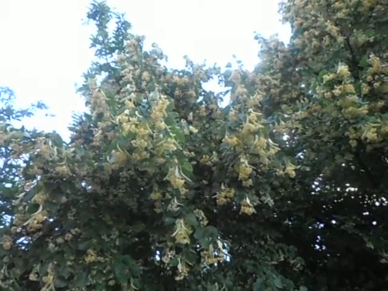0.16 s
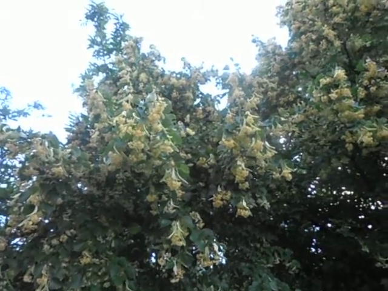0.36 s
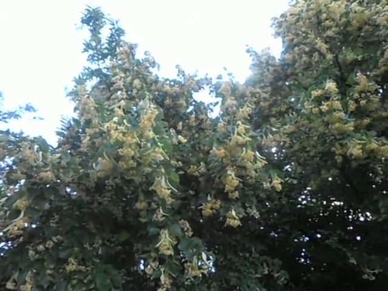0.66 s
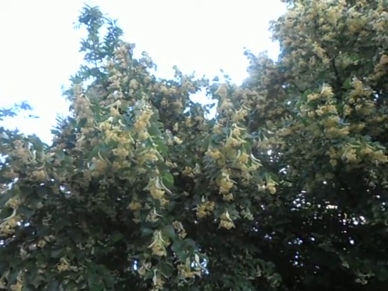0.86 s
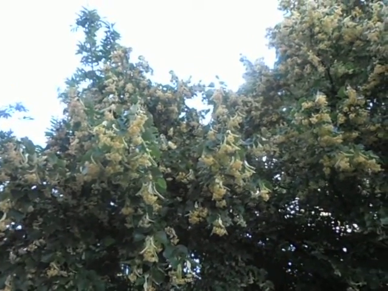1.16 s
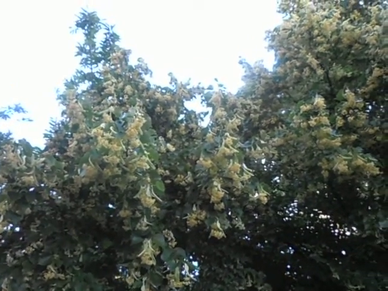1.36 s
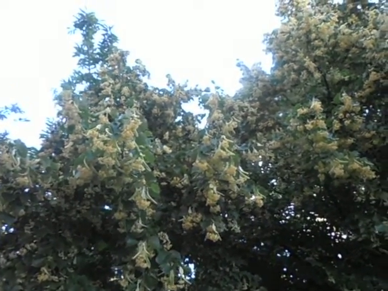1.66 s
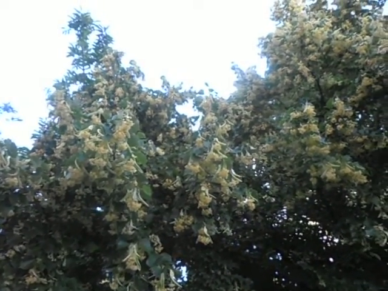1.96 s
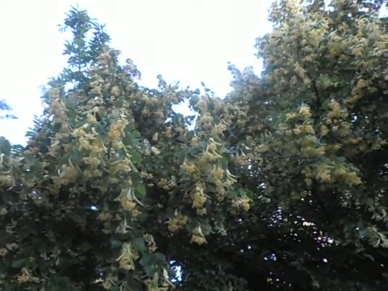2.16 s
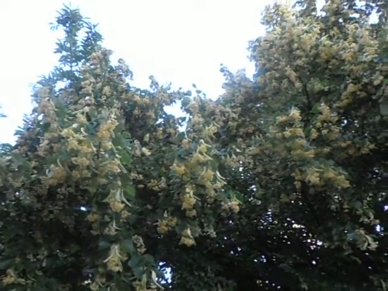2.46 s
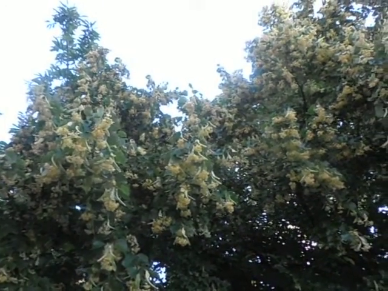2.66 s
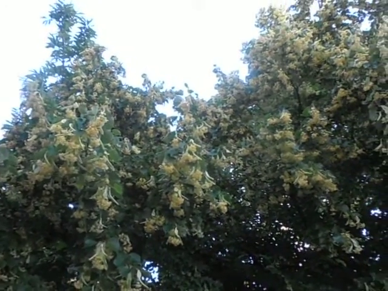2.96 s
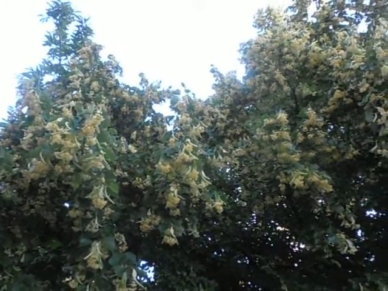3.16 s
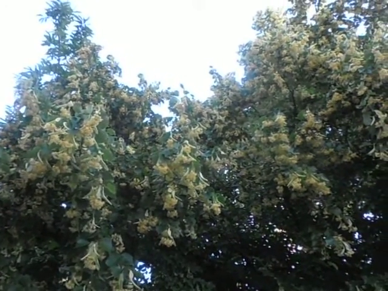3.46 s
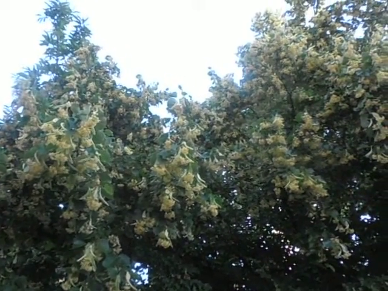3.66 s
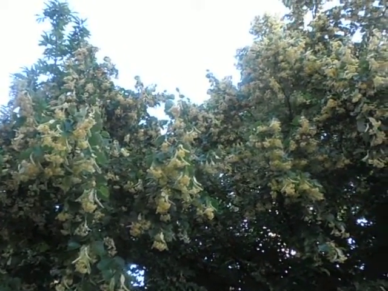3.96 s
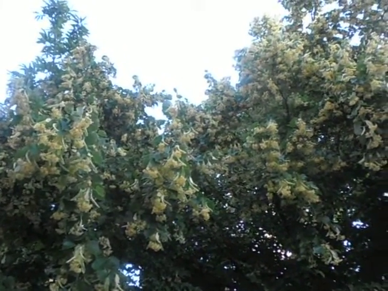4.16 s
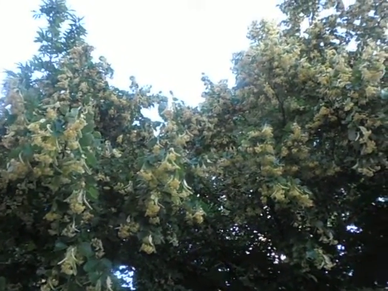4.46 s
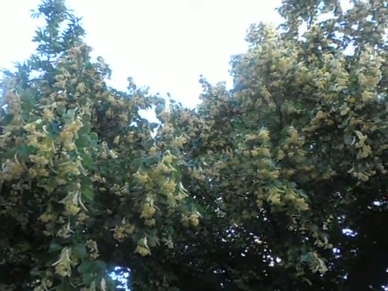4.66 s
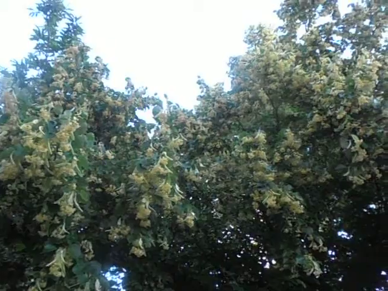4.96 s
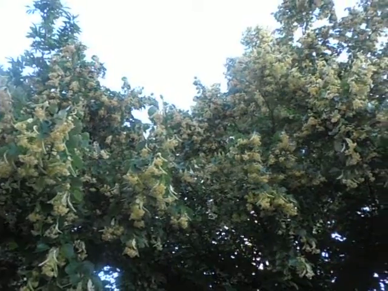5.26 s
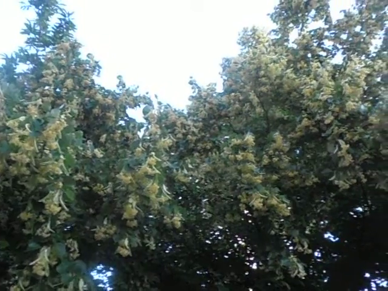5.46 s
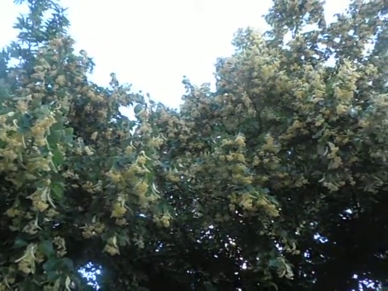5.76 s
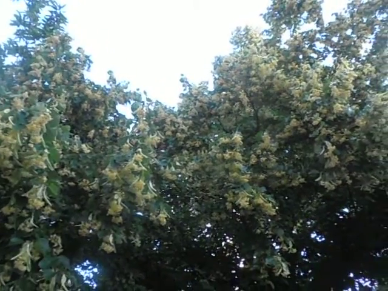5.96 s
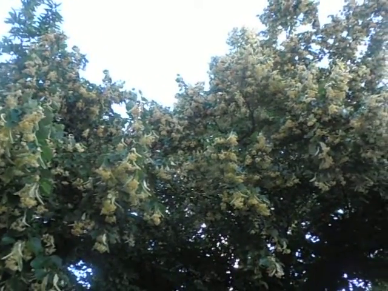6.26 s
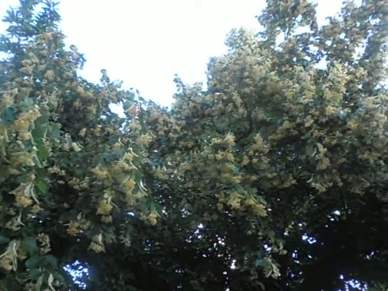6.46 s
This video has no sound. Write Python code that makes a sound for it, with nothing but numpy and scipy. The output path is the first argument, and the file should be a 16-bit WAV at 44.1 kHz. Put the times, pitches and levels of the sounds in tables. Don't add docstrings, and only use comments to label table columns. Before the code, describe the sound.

A crowd of bees hums evenly in a flowering tree while a finch sings one trilled phrase and a hard plastic click snaps at two seconds.

```python
import sys
import numpy as np
from scipy import signal
from scipy.fft import rfft, irfft
from scipy.io import wavfile
from scipy.ndimage import uniform_filter1d

SR = 44100
rng = np.random.default_rng(int(sys.argv[2]) if len(sys.argv) > 2 else 0)


def gain_from_db(level_db):
    decades = np.asarray(level_db, float) / 20
    return 10 ** decades


def wrap_up_sound(samples):
    columns = np.atleast_2d(samples).T
    tamed = np.clip(columns, -1, 1)
    steps = np.round(tamed * 32767).astype(np.int16)
    wavfile.write(sys.argv[1], SR, steps)


N = 291060

# (multiple of the wing beat, level [dB])
WING_OVERTONES = [(1, -10), (2, 0), (3, -7.5), (4, -9.5), (5, -10), (6, -10.5), (7, -14), (8, -45.5),
                  (9, -29)]
# (time [s], level [dB])
SWARM_LEVEL = [
    (0.0, -49),
    (0.46, -44.5),
    (0.81, -48),
    (1.29, -48),
    (1.6, -49),
    (3.75, -48),
    (4.08, -50.5),
    (4.7, -46),
    (4.96, -49.5),
    (6.6, -45.5),
]
# (delay [s], length [s], start pitch [Hz], end pitch [Hz], level [dB])
HIGH_SYLLABLE = [
    (-.03, 0.021, 6240, 6640, -5.5),
    (-.03, .014, 5800, 5860, -5),
    (.002, .017, 6060, 4600, 1.5),
    (.016, 0.0154, 4690, 3530, -2),
]
HIGH_LEAD_IN = [
    (-.058, .014, 7800, 6500, -8),
    (-.046, .013, 6570, 7500, -7),
]
LOW_SYLLABLE = [
    (-.001, 0.011, 4410, 4100, 2.5),
    (.012, .033, 4050, 3000, -0.5),
    (.041, .024, 3050, 2400, -5),
]
LOW_LEAD_IN = [
    (-.022, .023, 4700, 5900, -5.5),
]
QUICK_SYLLABLE = [
    (0, .008, 4480, 3100, -.3),
    (.008, .025, 3190, 2570, -1.4),
]
# (time [s], length [s], start pitch [Hz], end pitch [Hz], level [dB])
WHISTLES = [
    (2.401, .021, 5130, 3200, -49),
    (2.432, .04, 2610, 3860, -41),
    (2.466, .035, 3760, 2480, -45.5),
    (2.49, .035, 2570, 2170, -52),
    (2.44, 0.039, 5700, 4600, -59),
    (2.468, .018, 4570, 3600, -52),
    (2.485, .018, 3600, 4300, -58),
]
# (time [s], length [s], start pitch [Hz], end pitch [Hz], level [dB])
BUZZED_NOTES = [
    (2.113, .215, 2500, 4126, -43),
    (2.391, .027, 5450, 5340, -47),
    (5.93, .17, 6600, 6000, -68),
]
# (time [s], length [s], start pitch [Hz], end pitch [Hz], level [dB])
FAR_NOTES = [(.565, .02, 4875, 4000, -58), (.583, .052, 4000, 3980, -56), (.632, .009, 3900, 4650, -55),
             (.619, .02, 5900, 5200, -62), (2.176, .02, 5875, 5575, -66), (2.334, .03, 6150, 5600, -63),
             (2.555, .047, 6050, 4650, -59), (2.825, .02, 5100, 4600, -63), (2.985, .02, 4950, 4450, -61),
             (4.508, .09, 3125, 3060, -66), (4.692, .03, 2825, 2525, -63), (5.113, .022, 2615, 2625, -58),
             (5.158, .02, 2925, 2725, -62), (5.172, .09, 5650, 5780, -69), (5.33, .025, 4950, 4420, -60),
             (5.352, .065, 4440, 4475, -63), (5.504, .05, 4420, 4400, -65), (5.814, .06, 6525, 6775, -65),
             (4.96, .04, 3150, 2950, -65), (5.2, .035, 3000, 3100, -64), (5.69, .05, 3150, 3300, -65)]
# (delay [s], level [dB])
HEDGES = [
    (.032, -8),
    (0.045, -11.5),
]
# (time [s], level [dB], treble tilt [dB per octave])
LATCH_BLOWS = [
    (2.0831, -17, 9.5),
    (2.0839, -2, -1),
    (2.0872, -5.5, 7.5),
    (2.0883, 0, 0),
    (2.0896, -11.5, 6.5),
    (2.0977, -16, 0.5),
]
# (pitch [Hz], level [dB], time to fall 60 dB [s])
SHELL_TONES = [(1063, -14, 0.038), (1540, -26, .02), (1790, -14, 0.025), (1987, -6, 0.028),
               (2185, 2.5, 0.015), (2425, -5.5, 0.013), (2960, -11.5, .012), (4180, -20, .011),
               (4650, -22, 0.0085), (5800, -10, 0.0093), (7500, -6.5, 0.0088), (8490, -5.5, 0.007),
               (9900, -15, 0.0076), (13460, -3.5, 0.0064)]
# (time [s], length [s], level [dB])
FINGER_SHIFTS = [
    (.43, .03, -61),
    (.58, .04, -60),
    (1.59, .02, -55),
    (4.96, .03, -60),
    (5.05, .05, -60),
    (6.03, .1, -63),
    (6.24, .07, -55),
]
# (multiple of the clock, level [dB])
CLOCK_LEAKS = [(2, -82), (3, -79), (5, -81), (6, -92)]
# (frequency [Hz], level [dB per Hz])
TRAFFIC_COLOUR = [(20, -5), (60, -2.5), (130, -5), (280, -7.8), (900, -9), (1300, -15), (1700, -24),
                  (2500, -39)]
# (frequency [Hz], level [dB per Hz])
HISS_COLOUR = [(1000, -18), (3000, -18.5), (4000, -21), (7000, -19.5), (11000, -22), (16000, -24)]


def level(x, db):
    return x * gain_from_db(db) / np.sqrt(np.mean(x ** 2))


def band(x, lo_hz, hi_hz):
    return signal.sosfilt(signal.butter(2, [lo_hz, hi_hz], "band", fs=SR, output="sos"), x)


def walks(count, size, seconds):
    x = rng.standard_normal((count, size))
    width = max(int(seconds * SR / 8), 2)
    x = uniform_filter1d(uniform_filter1d(x, width, axis=1), width, axis=1)
    return x / x.std(axis=1, keepdims=True)


def bees(count=70):
    beat_hz, slower_hz, faster_hz = 178.8, 16, 26.96
    size = N // 8 + 1
    rank = (np.arange(count)[:, None] + .5) / count * 2 - 1
    own = np.sign(rank) * (1 - np.sqrt(1 - abs(rank)))
    place = own + .13 * walks(count, size, .35)
    spread_hz = np.where(place < 0, slower_hz, faster_hz)
    hz = beat_hz + spread_hz * place + 1.188 * walks(count, size, 0.01992)
    phase = 2 * np.pi * (np.cumsum(hz, axis=1) * 8 / SR + rng.random((count, 1)))
    near = gain_from_db(4.2 * walks(count, size, 0.26))
    hum = sum(gain_from_db(db) * np.sin(k * phase + k * k) for k, db in WING_OVERTONES)
    hum = signal.resample_poly((near * hum).sum(axis=0), 8, 1)[:N]
    s, db = np.transpose(SWARM_LEVEL)
    swell_db = 0.5 * (np.interp(np.arange(N) / SR, s, db) - db.mean())
    return level(hum, db.mean() + 2.5) * gain_from_db(swell_db)


def add_note(out, s, length, start_hz, end_hz, db, shake_hz=0., left=.36):
    u = np.arange(int(length * SR)) / (length * SR)
    hz = start_hz + (end_hz - start_hz) * (u + (2 - 4 * left) * u * (1 - u))
    uneven = 8 * uniform_filter1d(rng.standard_normal(len(u)), 64)
    wobble = np.cumsum(208.2 * (1 + 0.274 * uneven)) / SR
    hz = hz + shake_hz * np.sin(2 * np.pi * wobble)
    shape = np.sin(np.pi * u) ** (0.6 if shake_hz > 200 else 0.21)
    i = int(s * SR)
    out[i:i + len(u)] += gain_from_db(db) * np.sqrt(2) * shape * np.sin(2 * np.pi * np.cumsum(hz) / SR)


def trill(first_s, spacing_s, top_db, peak, fall_db, count):
    k = np.arange(count)
    return list(zip(first_s + spacing_s * k, top_db - fall_db * abs(k / (count - 1) - peak)))


def finch_song():
    finch = np.zeros(N)
    high = trill(.765, .14, -41.5, peak=0.96, fall_db=9, count=4)
    low = trill(1.2925, .147, -42.5, peak=0.83, fall_db=2.8, count=4)
    quick = trill(1.853, .0475, -46, peak=0.22, fall_db=15, count=5)
    parts = ((HIGH_SYLLABLE, high, 60), (HIGH_LEAD_IN, high, 350), (LOW_SYLLABLE, low, 40),
             (LOW_LEAD_IN, low, 350), (QUICK_SYLLABLE, quick, 150))
    for glides, times, shake_hz in parts:
        for s, db in times:
            bend = 1 + 0.013 * rng.standard_normal()
            for delay, length, start_hz, end_hz, part_db in glides:
                add_note(finch, s + delay, length, start_hz * bend, end_hz * bend, db + part_db, shake_hz)
    for row in WHISTLES:
        add_note(finch, *row, shake_hz=70)
    for row in BUZZED_NOTES:
        add_note(finch, *row, shake_hz=342, left=.2)
    ground_s, ground_db = .00094, -15
    return band(finch + gain_from_db(ground_db) * np.roll(finch, int(ground_s * SR)), 2320, 7600)


def far_birds():
    others = np.zeros(N)
    for row in FAR_NOTES:
        add_note(others, *row, shake_hz=70)
    return others


def garden_echo():
    t = np.arange(SR // 2) / SR
    clumps = gain_from_db(3.4 * rng.standard_normal(len(t) // 256 + 1).repeat(256)[:len(t)])
    leaves = rng.standard_normal(len(t)) * clumps * gain_from_db(-60 * t / 0.4)
    twigs = rng.standard_normal(len(t)) * np.exp(-t / 0.0092)
    path = gain_from_db(1) * leaves / np.linalg.norm(leaves) + gain_from_db(-6.5) * twigs / np.linalg.norm(twigs)
    for s, db in HEDGES:
        hedge = rng.standard_normal(len(t)) * np.exp(-((t - s) / .004) ** 2)
        path += gain_from_db(db) * hedge / np.linalg.norm(hedge)
    return path


def birds():
    finch, others = finch_song(), far_birds()
    scattered = signal.fftconvolve(finch + gain_from_db(-8) * others, garden_echo())[:N]
    return gain_from_db(-0.5) * finch + others + scattered


def snap():
    out, t = np.zeros(N), np.arange(SR // 16) / SR
    hz, db, t60 = np.transpose(SHELL_TONES)[:, :, None]
    chance = rng.standard_normal((len(LATCH_BLOWS), len(SHELL_TONES), 2))
    for (s, blow_db, treble_db), c in zip(LATCH_BLOWS, chance):
        gain = gain_from_db(blow_db + db + treble_db * np.log2(hz / 2000) + 3.9 * c[:, :1])
        tone = np.sin(2 * np.pi * hz * (1 + 0.012 * c[:, 1:]) * t)
        ring = (gain * gain_from_db(-60 * t / t60) * tone).sum(axis=0)
        crack = gain_from_db(blow_db + 2 * treble_db - 6.0) * rng.standard_normal(len(t)) * np.exp(-t / 0.0013)
        onset = 1 - np.exp(-t / 0.0002)
        i = int(s * SR)
        out[i:i + len(t)] += (0.53 * ring + crack) * onset
    return band(band(out, 820, 11200), 450, 11700)


def rustles():
    t = np.arange(N) / SR
    gate = np.zeros(N)
    for s, length, db in FINGER_SHIFTS:
        half = length / 2
        gate += gain_from_db(db) * np.exp(-((t - s - half) / half) ** 2)
    tick_size = gain_from_db(2 * rng.exponential(size=N // 32 + 1)).repeat(32)[:N]
    ticks = rng.standard_normal(N) * tick_size
    return gate * level(band(ticks, 5000, 12000), 0)


def whines():
    line_hz, sensor_hz, slip_s = 1966.77, 12709.64, 4.95
    t = np.arange(N) / SR
    late = t - .01 * (t > slip_s)
    lit = uniform_filter1d(1. * ((30.03 * late + .17) % 1 < .45), 40)
    clock = 2 * np.pi * line_hz * t
    display = gain_from_db(-51.0) * lit * np.sin(4 * clock) + gain_from_db(-57.5) * (1 - lit) * np.cos(4 * clock)
    frame = (29.967 * late - .28) % 1
    fading = (frame >= .3) * .5 * np.exp(-(frame - .3) / .07)
    reading = uniform_filter1d((frame < .3) + fading, 40)
    sensor = gain_from_db(-58.5) * reading * np.sin(2 * np.pi * sensor_hz * t)
    leaks = sum(gain_from_db(db + 7.0) * np.sin(k * clock) for k, db in CLOCK_LEAKS)
    return display + sensor + leaks


def noise_colour(table):
    hz, db = np.transpose(table)
    log_hz = np.log(np.maximum(np.arange(N // 2 + 1) * SR / N, 1))
    return gain_from_db(np.interp(log_hz, np.log(hz), db))


def air():
    colour = np.hypot(noise_colour(TRAFFIC_COLOUR), noise_colour(HISS_COLOUR))
    return level(irfft(rfft(rng.standard_normal(N)) * colour, N), -48.5)


def scene():
    return (bees() + birds() + snap() + rustles() + whines() + air())[None]


def low_pass(x):
    return signal.sosfilt(signal.butter(12, 16800, fs=SR, output="sos"), x)


def record(dry):
    cut = signal.sosfilt(signal.ellip(10, .3, 60, 15740, fs=SR, output="sos"), dry)
    flat = cut / (1 + (cut / .62) ** 4) ** .25
    flat = signal.sosfilt(signal.ellip(8, .1, 70, 16200, fs=SR, output="sos"), flat)
    return low_pass(flat - .0028)


dry = scene()
out = record(dry)
wrap_up_sound(out)
```